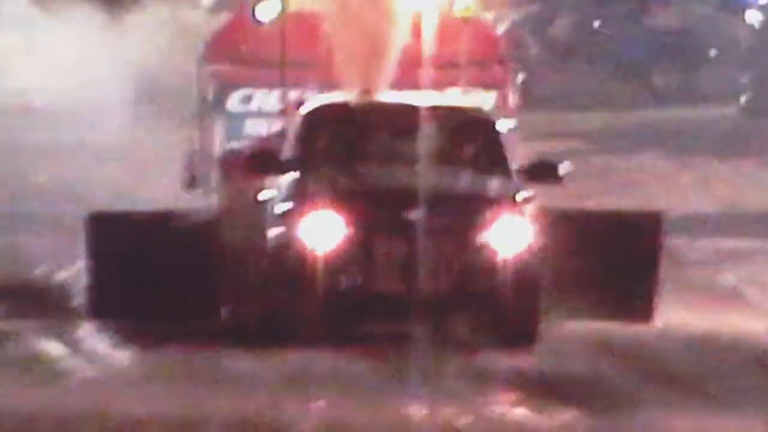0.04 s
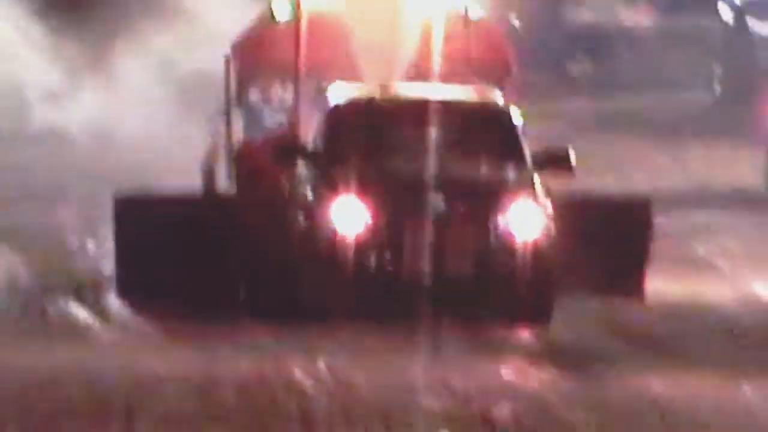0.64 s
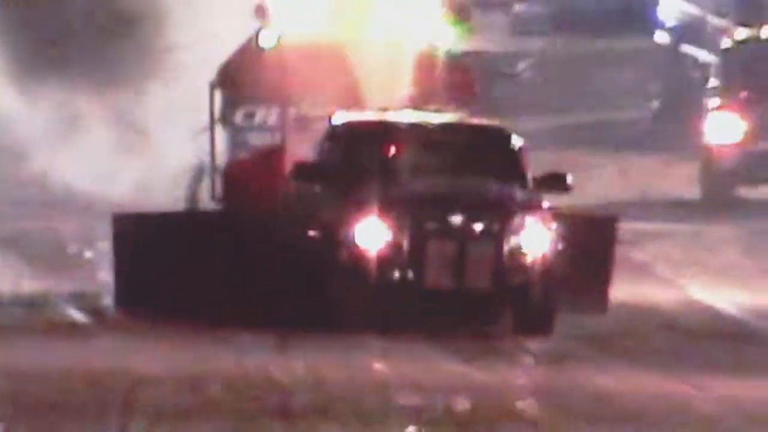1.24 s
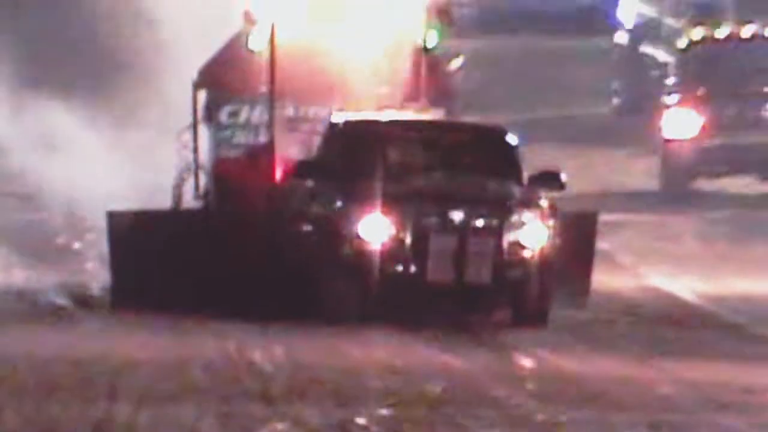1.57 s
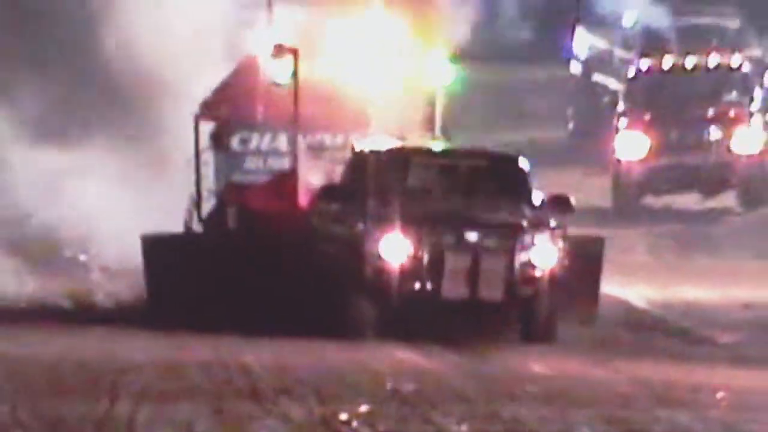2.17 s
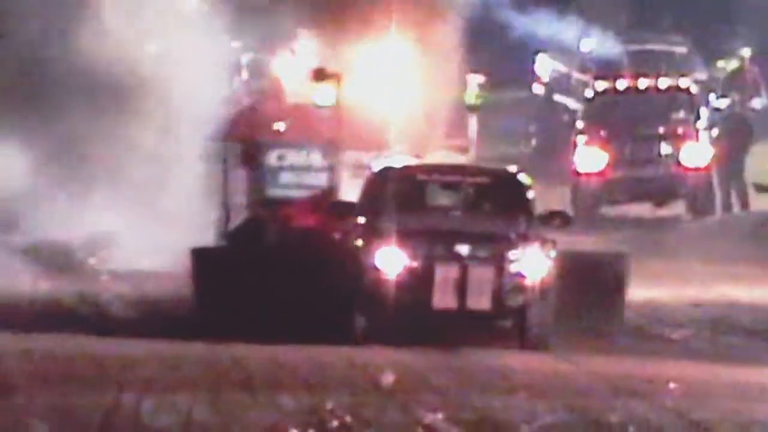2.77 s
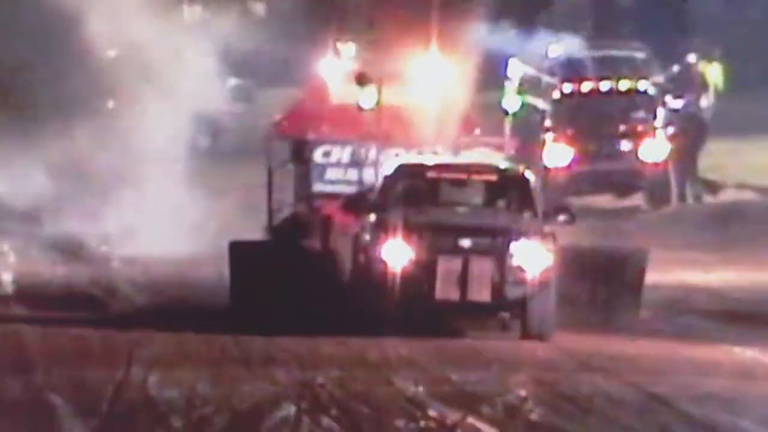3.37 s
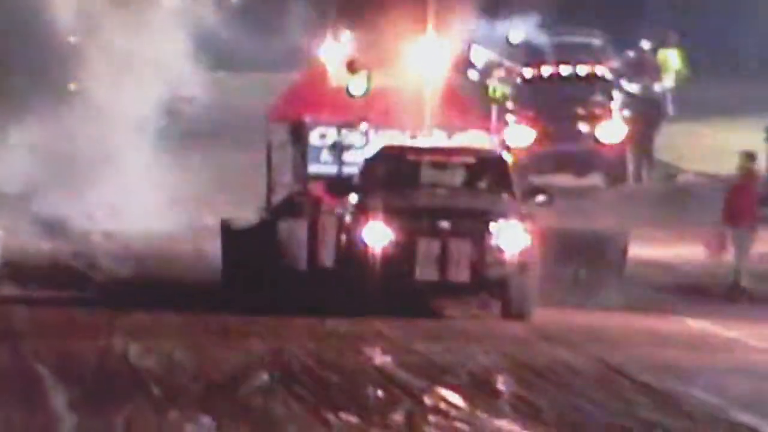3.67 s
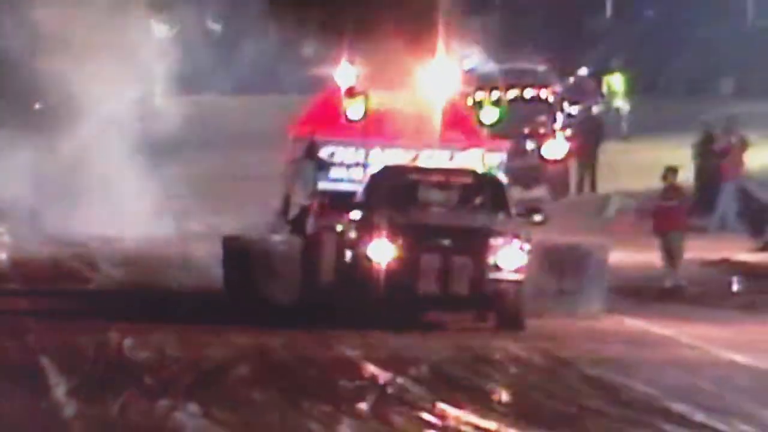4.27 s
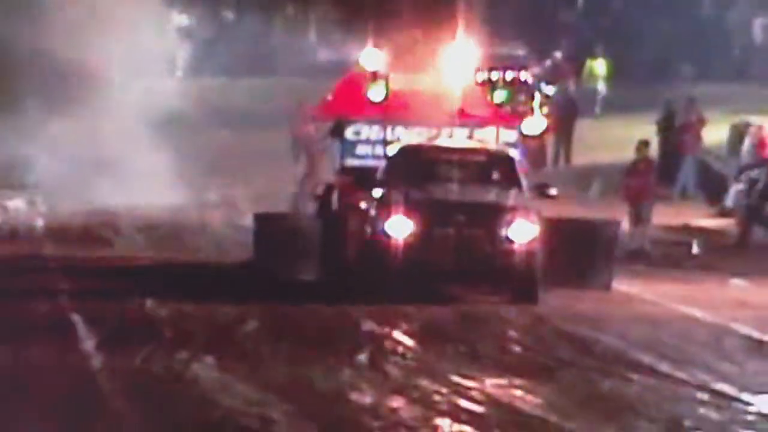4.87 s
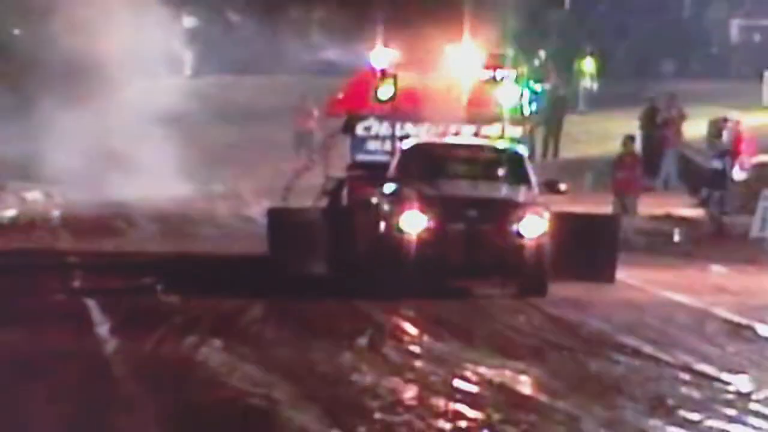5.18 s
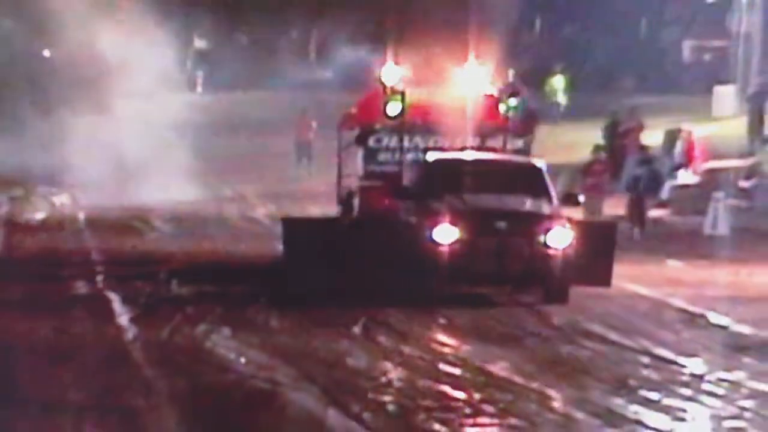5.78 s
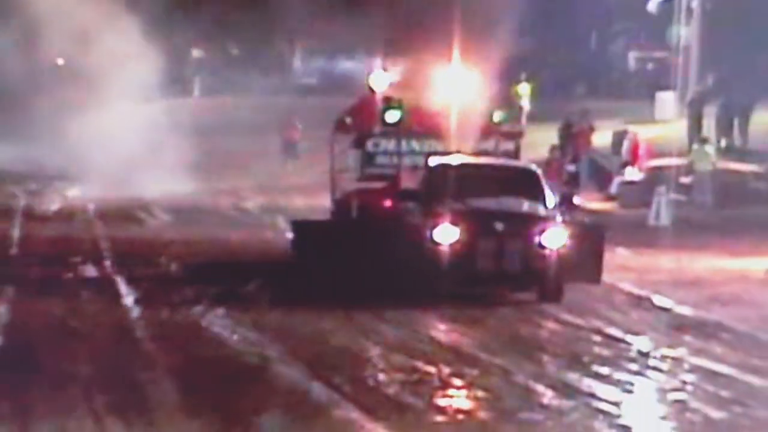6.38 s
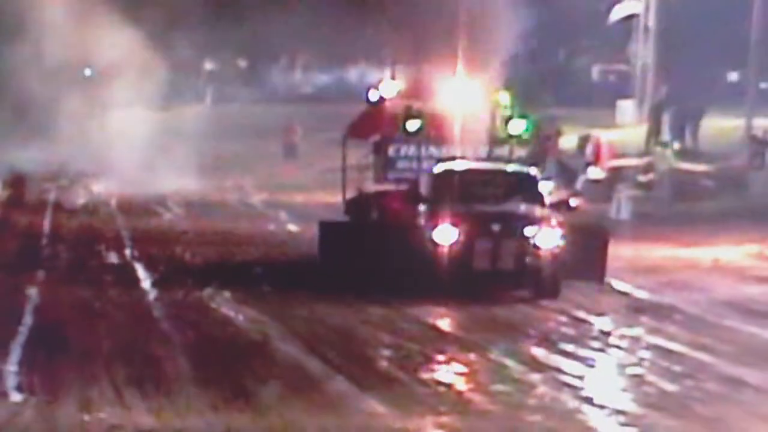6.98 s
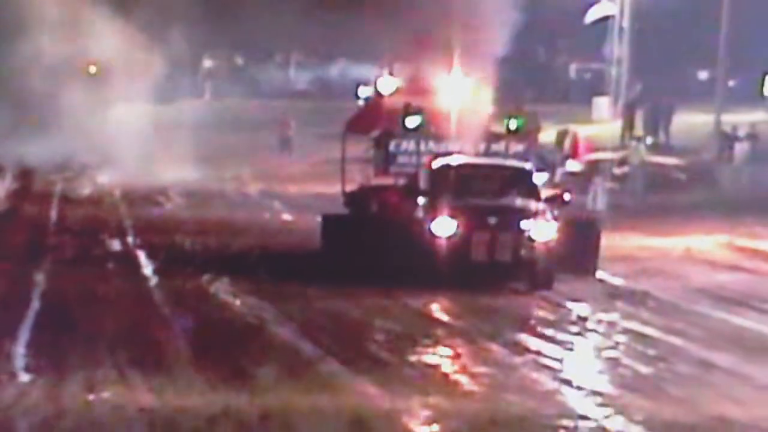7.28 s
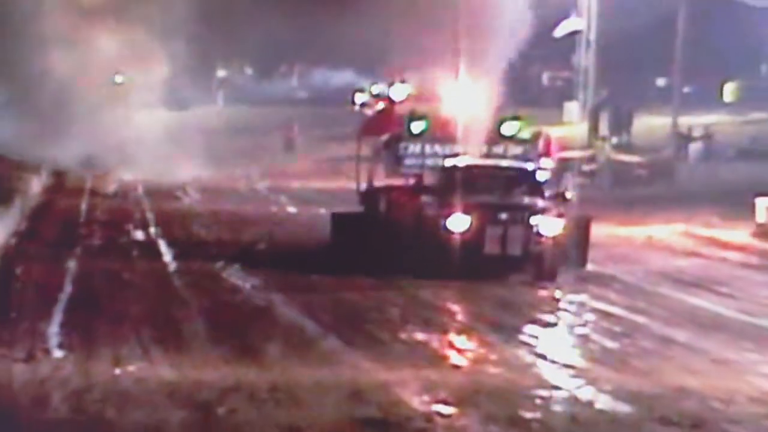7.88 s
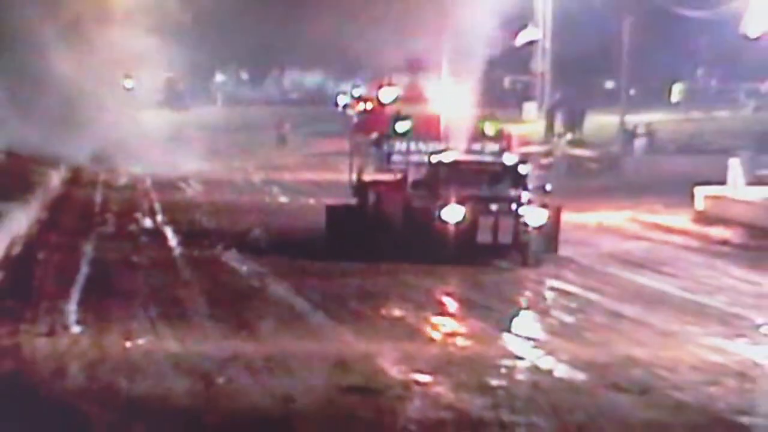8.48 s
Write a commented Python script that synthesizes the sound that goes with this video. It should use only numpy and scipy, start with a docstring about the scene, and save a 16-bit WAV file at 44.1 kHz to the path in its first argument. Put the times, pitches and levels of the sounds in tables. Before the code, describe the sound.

Heard from beside an outdoor dirt track, a pulling truck's engine roars flat out the whole time, harsh and buzzing, with a thin exhaust hiss on top and the sled rumbling faintly below. It is fiercest early on, eases a little, then slowly falls in pitch as it labours. Toward the end it sputters and surges a few times, with short reflections from the ground.

```python
"""V8 truck pulling a sled

Outdoors, one microphone beside a dirt track: a V8 truck at full throttle drags a weighted sled.
Its open stacks drone at the firing rate and pop once a cycle on the strongest cylinder, with a sizzle
of hot gas on top. The growing load pulls the revs down until the engine stumbles. The ground close by
and the trackside farther off throw the noise back."""
import sys
import numpy as np
from scipy import signal
from scipy.fft import rfft, irfft
from scipy.io import wavfile
from scipy.ndimage import uniform_filter1d

SR = 44100
rng = np.random.default_rng(int(sys.argv[2]) if len(sys.argv) > 2 else 0)


def wav_out(sig):
    """Save sig, one row per channel (or a flat mono array), as 16-bit PCM at SR to the path in sys.argv[1]."""
    wavfile.write(sys.argv[1], SR, np.round(np.clip(np.atleast_2d(sig).T, -1, 1) * 32767).astype(np.int16))


N = 380583
T = np.arange(N) / SR

# the eight firings of one cycle: (strength [dB], extra travel time in the header [ms])
CYLINDERS = [(-4, .12), (-8.5, -.02), (-7, -.66), (3.5, .01), (-5, .24), (-6.5, -.51), (-16.5, -1.09),
             (-3, -0.262)]
# stumbles under load: (time [s], gap [dB], surge [dB], drop in firing rate [Hz], added effort [dB])
STUMBLES = [(7.547, -2.5, 3.5, 1.3, 4.5), (7.838, -6.5, 7, 10.4, 6), (8.162, -9, 3, 11.1, 4),
            (8.438, -8.5, 3.5, 7.4, 1)]
SURGE_LAG_S = 0.025  # the engine catches this long after a stumble


def undb(db):
    """Decibels to gain."""
    return 10 ** (np.asarray(db) / 20)


def unit(x):
    """Scale to rms 1."""
    return x / np.sqrt(np.mean(x ** 2))


def even(x, seconds=0.6):
    """Hold the running rms near 1."""
    return x / np.sqrt(uniform_filter1d(x ** 2, int(seconds * SR)) + 1e-12)


def curve(table):
    """Join (time, value) points by straight lines."""
    return np.interp(T, *np.transpose(table))


def noise():
    """White noise."""
    return rng.standard_normal(N)


def walk(rate):
    """Smooth random drift with about `rate` turns a second and spread near 1."""
    hold = int(SR / rate)
    steps = np.repeat(noise()[:N // hold + 1], hold)
    return 1.3 * uniform_filter1d(uniform_filter1d(steps, hold), hold)[:N]


def bump(at_s, width_s):
    """A bell-shaped swell in time."""
    return np.exp(-.5 * ((T - at_s) / width_s) ** 2)


def colour(x, points, size=8192):
    """Minimum-phase filter through (frequency [Hz], gain [dB]) points."""
    hz, db = np.transpose(points)
    bin_hz = np.maximum(np.arange(size // 2 + 1) * SR / size, 1)
    bin_db = np.interp(np.log(bin_hz), np.log(hz), db, right=db.min() - 21)
    cepstrum = irfft(np.log(undb(bin_db)))
    cepstrum[1:size // 2] *= 2
    cepstrum[size // 2 + 1:] = 0
    return signal.fftconvolve(x, irfft(np.exp(rfft(cepstrum))))[:N]


def engine_speed(sag_s=.05, hold_s=.078, recover_s=.125):
    """Firings per second: the load drags the revs down; they sag at stumbles and lift as tyres slip."""
    # engine speed: (time [s], firing rate [Hz])
    revs = [(0, 264.18), (0.14, 280.09), (0.42, 279.01), (0.84, 282.32), (1.4, 284.1), (1.54, 282.15),
            (1.68, 286.22), (1.96, 282.01), (2.24, 274.47), (2.66, 272.72), (2.8, 265.24), (3.08, 263.76),
            (3.22, 259.49), (3.5, 260.49), (4.1, 268.22), (4.62, 273.98), (4.9, 269.7), (5.4, 264.05),
            (5.9, 256.84), (6.44, 249.96), (7, 241.4), (7.14, 236.05), (7.56, 232.86), (7.98, 233.95),
            (8.3, 234.25), (8.63, 229.93)]
    # the tyres lose grip: (time [s], rise in firing rate [Hz])
    slips = [(6.28, 5), (6.75, 5.5)]
    shape_s = np.array([-sag_s, 0, hold_s, hold_s + recover_s])
    sag_hz = sum(drop_hz * np.interp(T, s + shape_s, [0, 1, 1, 0]) for s, _, _, drop_hz, _ in STUMBLES)
    lift_hz = sum(rise_hz * bump(s, width_s=.05) for s, rise_hz in slips)
    return curve(revs) - sag_hz + lift_hz


def firings(firing_count, valve_lag=1.5, jitter_ms=0.059, scatter_db=1.72):
    """One pressure pulse per firing, each down its own pipe; weak cylinders fire less evenly."""
    # single firings that stand out from the pattern: (time [s], change in strength [dB])
    odd_firings = [(0.333, 0.5), (0.363, 3), (0.42, -1), (.449, 1.5), (.648, 0.5), (1.44, 2), (1.497, -1),
                   (1.666, 1.5), (1.779, 3.5), (1.948, 1.5), (3.035, 3), (3.372, -2), (3.435, 4),
                   (3.526, 4.5), (3.556, 2), (5.866, 1.5), (6.336, 1), (7.215, 3.5)]
    k = np.arange(int(firing_count[-1]) - 1)
    strength_db, path_ms = np.array(CYLINDERS)[k % len(CYLINDERS)].T
    time_chance, level_chance = rng.standard_normal((len(k), 2)).T
    uneven = undb(-strength_db / 2)
    delay_ms = path_ms + jitter_ms * uneven * time_chance
    at_s = np.interp(k + valve_lag, firing_count, T) + delay_ms / 1000
    db = strength_db + scatter_db * uneven * level_chance
    for s, change_db in odd_firings:
        db = db + change_db * (abs(at_s - s) < .003)
    return np.bincount(np.clip(at_s * SR, 0, N - 1).astype(int), undb(db), N)


def exhaust_swings(steady_db, flare_s=0.026, turns=8.1):
    """Effort and bark level in dB: both wander, flare, and jump as the engine catches after a stumble."""
    # the stacks' bark near one kilohertz: (time [s], level [dB])
    bark_levels = [(.08, -30), (.23, -25), (1.1, -21.5), (1.8, -24), (2.1, -27.5), (2.4, -35.5),
                   (2.73, -36.5), (3.0, -32.5), (3.5, -24), (3.8, -30), (4.1, -29), (4.35, -33),
                   (5.05, -33), (5.35, -34), (6.1, -34.5), (6.75, -39.5), (7.33, -30.5), (7.7, -38.5),
                   (8.63, -36.5)]
    # short flares of the exhaust: (time [s], added effort [dB], added bark [dB])
    flares = [(0.247, 3.5, 2), (.64, 1.5, 4), (.9, 2, 1), (1.082, -1.5, 3), (2.869, 4.5, 6),
              (3.531, 1, 3.5), (4.579, 1.5, 2.5), (5.251, 3, 3.5), (5.409, 2.5, 6), (5.571, 3.5, 0.5),
              (5.9, 2.5, 0), (6.339, 1.5, 2.5), (6.911, 3, 5)]
    catch_db = sum(db * bump(s + SURGE_LAG_S, flare_s) for s, *_, db in STUMBLES)
    effort_db = steady_db + catch_db + 0.73 * walk(turns)
    bark_db = curve(bark_levels) + 1.32 * catch_db + 0.43 * walk(turns)
    for s, added_effort_db, added_bark_db in flares:
        flare = bump(s, flare_s)
        effort_db += added_effort_db * flare
        bark_db += added_bark_db * flare
    return effort_db, bark_db


def drone(firing_count, effort_db, over_hz, swell_at=5.2):
    """The firing tone swells once a cycle, which adds side tones; under high effort it yields to them."""
    # side tones: (multiple of the cycle rate, level [dB], growth with effort [dB/dB],
    # growth with firing rate [dB/Hz], ceiling [dB])
    side_tones = [(4, -51.5, 1.46, -.19, -44.5), (5, -38.5, 2.45, 0.24, -39.5), (6, -41.5, 1, 0.47, -25.5),
                  (7, -35, 2.24, 1, -29.5), (9, -43, 2.8, 0, -36), (10, -40.5, 1.84, -0.1, -38.5),
                  (12, -54, 0.6, 0.2, -44), (14, -55, 4, 1, -41), (15, -56, 2.5, 0, -49.5),
                  (18, -55, 2.2, 0.8, -41)]
    cylinders = len(CYLINDERS)
    angle = 2 * np.pi * (firing_count - swell_at) / cylinders  # zero just after the strongest cylinder
    firing_db = -19.5 - 0.93 * np.maximum(effort_db - 0.03, 0)
    flutter_db = .7 * undb(.6 * effort_db) * walk(55)
    out = undb(firing_db + flutter_db) * np.cos(cylinders * angle)
    for multiple, base_db, per_db, per_hz, ceiling_db in side_tones:
        phase_waver = .25 * walk(15)
        db = np.minimum(base_db + per_db * effort_db + per_hz * over_hz, ceiling_db) + 1.1 * walk(15)
        out = out + undb(db) * np.cos(multiple * angle + phase_waver)
    return np.sqrt(2) * out


def puffs(pulses, decay_ms):
    """Turbulent gas that bursts out with each pulse and dies away."""
    envelope = signal.lfilter([1], [1, -np.exp(-1000 / (decay_ms * SR))], pulses)
    return unit(envelope * noise())


def trackside(x, wash_db, t60_s=0.66):
    """Direct sound, a short diffuse wash, and echoes whose paths shift as the truck moves."""
    # reflections reaching the microphone: (delay [ms], level [dB], drift [ms])
    echoes = [(1.96, -26.5, 0.26), (6.06, -8.5, 0.49), (29.91, -14, .65)]
    tail_s = T[:SR // 2]
    tail = noise()[:len(tail_s)] * undb(-60 * tail_s / t60_s)
    out = x + undb(wash_db) * signal.fftconvolve(x, tail / np.linalg.norm(tail))[:N]
    for delay_ms, db, drift_ms in echoes:
        delay_s = (delay_ms + drift_ms * walk(1.5)) / 1000
        out = out + undb(db) * np.interp(T - delay_s, T, x, left=0)
    return unit(out)


def bark(pulses, turbulence_db, effort_db):
    """The pulses ring the stacks near one kilohertz; a broad knock takes over when the flow is strong."""
    # double resonance of the stacks: (frequency [Hz], gain [dB])
    ring_colour = [(600, -35.5), (810, -16), (870, -3), (915, 2), (970, -4), (1028, 8.5), (1072, -1.5),
                   (1130, -22), (1400, -38)]
    # their short, broad knock: (frequency [Hz], gain [dB])
    knock_colour = [(600, -29), (800, -12), (930, -1), (1040, 1), (1150, -13), (1400, -24.5)]
    push = unit(pulses) + undb(turbulence_db - 14) * puffs(pulses, decay_ms=2)
    ring = unit(colour(push, ring_colour))
    knock = undb(-2 + 0.6 * effort_db) * unit(colour(push, knock_colour))
    return even(trackside(ring + knock, wash_db=-22))


def rasp(pulses, turbulence_db, effort_db, labour_hz):
    """The broad edge of each firing; a roar of gas fills in between the pops as the revs are dragged down."""
    # spectrum of the rasp: (frequency [Hz], gain [dB])
    rasp_colour = [(90, -11.5), (135, -6), (260, -5), (330, 2.5), (400, -0.5), (490, 0), (555, -5),
                   (650, .5), (800, -0.5), (1180, 1.5), (1300, -4), (1440, 2.5), (1620, -1), (1770, -8),
                   (1985, -0.5), (2090, -13.5), (2450, -12.5), (2750, -33.5), (3100, -27.5), (4200, -28.5),
                   (4700, -43.5)]
    roar = undb(-6 + 0.16 * labour_hz) * puffs(pulses, decay_ms=35)
    bursts = undb(turbulence_db - 3.5) * puffs(pulses, decay_ms=2.8)
    edge = colour(unit(pulses) + bursts + roar, rasp_colour)
    level_db = -35 + 1.14 * effort_db + 0.037 * labour_hz
    return undb(level_db) * trackside(edge, wash_db=-12)


def sizzle(pulses, effort_db):
    """Hot gas hisses in a gritty jet and spits at each firing; with effort the hiss outgrows the spit."""
    # spectrum of the hot gas: (frequency [Hz], gain [dB])
    gas_colour = [(1800, -28), (2400, -12), (2750, -10.5), (3040, 2), (3600, -7.5), (4200, -2),
                  (4600, -22.5), (5500, -8.5), (6800, 3.5), (7400, 3), (7800, -22)]
    jet = undb(1 + 3 * walk(30)) * unit(undb(3 * walk(700)) * noise())
    spit = undb(-4 - 0.4 * effort_db) * puffs(pulses, decay_ms=2.8)
    hiss = puffs(pulses, decay_ms=53)
    return undb(-50 + 1.47 * effort_db) * unit(colour(hiss + spit + jet, gas_colour))


def sled_rumble(effort_db, labour_hz):
    """The dragged sled rumbles, more with effort and as the load holds the revs down."""
    # low noise of sled and grounds: (frequency [Hz], gain [dB])
    rumble_colour = [(15, -16.5), (35, -9.5), (50, -13), (58, 6), (67, -15.5), (100, -6), (140, -0.5),
                     (250, -4.5)]
    return undb(-43.5 + 1.3 * effort_db + 0.02 * labour_hz) * unit(colour(noise(), rumble_colour))


def howl(turns=45):
    """A faint, breathy band that swells and fades as it slides down through the bark."""
    # slides: (start [s], end [s], from [Hz], to [Hz], peak level [dB])
    slides = [(1.45, 1.959, 930, 738, -35.5), (7.09, 7.515, 977, 810, -38.5)]
    out = 0
    for start, end, from_hz, to_hz, db in slides:
        progress = np.clip((T - start) / (end - start), 0, 1)
        phase = 2 * np.pi * np.cumsum(from_hz + (to_hz - from_hz) * progress) / SR
        band = unit(walk(turns) * np.cos(phase) + walk(turns) * np.sin(phase))
        out = out + undb(db) * np.sin(np.pi * progress) * band
    return out


def stumble_gain(width_s=0.012):
    """At each stumble the drone drops out briefly, then surges as the engine catches."""
    return undb(sum(gap_db * bump(s, width_s) + surge_db * bump(s + SURGE_LAG_S, width_s)
                    for s, gap_db, surge_db, *_ in STUMBLES))


def scene(pulling_hz=260.9):
    """From the trackside, in mono: drone, bark, rasp and sizzle on one crankshaft, plus sled and howl."""
    # how hard the exhaust blows, against its usual level: (time [s], effort [dB])
    effort = [(0, -1), (.1, 0.5), (.23, 3), (1.3, 5), (1.85, 6), (2.12, 2.5), (2.32, -1.5), (2.75, -3.5),
              (2.95, -0.4), (3.55, 2), (3.75, -0.5), (4.3, -2), (5.05, -3), (5.3, 0.06), (6.65, -2),
              (7.3, -2), (8.05, -1.5), (8.25, 0.3)]
    firing_hz = engine_speed()
    over_hz = firing_hz - pulling_hz
    labour_hz = np.maximum(-over_hz, 0)  # how far the load holds the revs under the pulling rate
    firing_count = np.cumsum(firing_hz) / SR
    pulses = firings(firing_count)
    steady_db = curve(effort)
    effort_db, bark_db = exhaust_swings(steady_db)
    turbulence_db = 0.48 * effort_db  # a harder exhaust is more turbulent
    truck = drone(firing_count, steady_db, over_hz) * stumble_gain()
    truck += bark(pulses, turbulence_db, effort_db) * undb(bark_db)
    truck += rasp(pulses, turbulence_db, effort_db, labour_hz)
    truck += sizzle(pulses, effort_db)
    return (truck + sled_rumble(effort_db, labour_hz) + howl())[None]


def record(dry, top_hz=7700):
    """The microphone channel cuts the top steeply."""
    return signal.sosfilt(signal.ellip(10, .2, 80, top_hz, fs=SR, output="sos"), dry)


dry = scene()
out = record(dry)
wav_out(out)
```